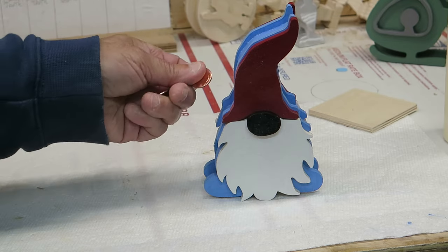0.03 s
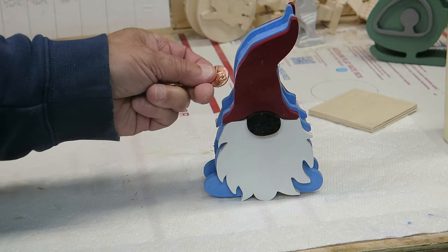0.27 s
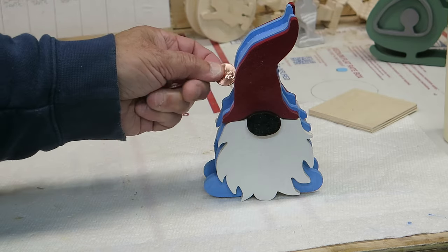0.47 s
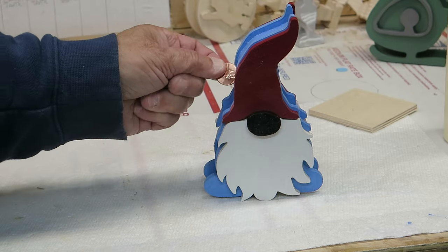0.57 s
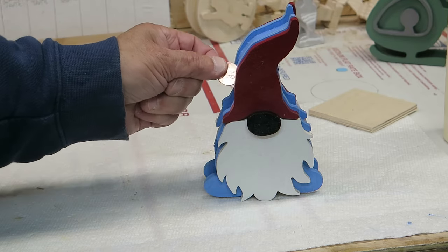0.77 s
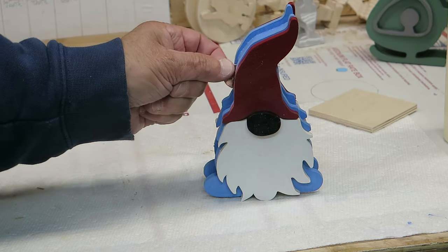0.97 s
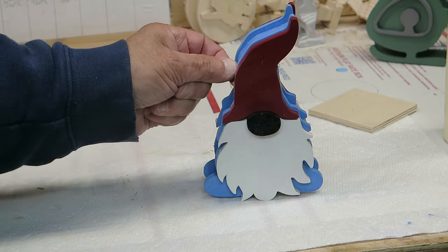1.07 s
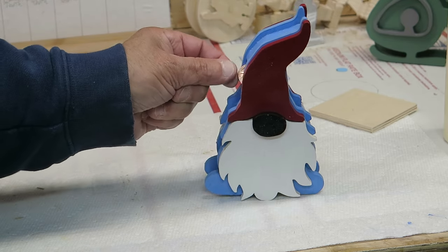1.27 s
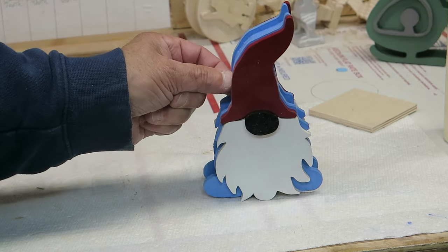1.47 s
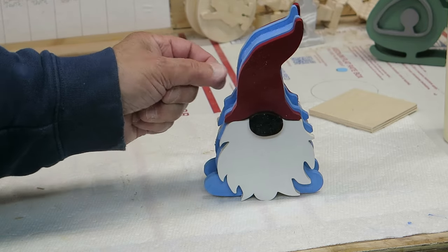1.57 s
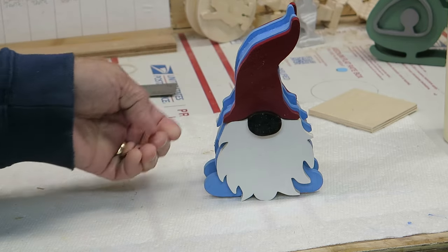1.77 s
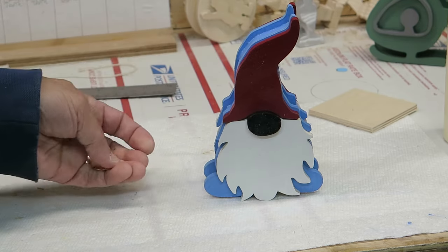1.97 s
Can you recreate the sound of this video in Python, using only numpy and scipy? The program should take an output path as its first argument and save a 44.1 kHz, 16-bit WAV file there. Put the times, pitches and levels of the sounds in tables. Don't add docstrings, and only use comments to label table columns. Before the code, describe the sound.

A coin drops into a hollow wooden bank. Only soft hiss and very faint hum are heard until about 1.59 seconds, when a loud, slightly overloaded clink with a woody knock strikes. Smaller bounces follow at 1.64, a tight rattle near 1.70, and last ticks around 1.75 to 1.8. The hiss dips, then creeps back; faint paper rustle and taps begin near 1.97. Close, quiet room.

```python
import sys
import numpy as np
from scipy import signal
from scipy.fft import rfft, irfft
from scipy.io import wavfile
from scipy.ndimage import uniform_filter1d

SR = 44100
rng = np.random.default_rng(int(sys.argv[2]) if len(sys.argv) > 2 else 0)


def boost(x):
    u = np.asarray(x, float) / 20
    return 10 ** u


def bounce(signal):
    frames = np.transpose(np.atleast_2d(signal))
    limited = np.clip(frames, -1, 1)
    pcm = np.round(limited * 32767).astype(np.int16)
    wavfile.write(sys.argv[1], SR, pcm)


N = 88596

# (frequency [Hz], density [dB per Hz])
HISS_MID = [(15, -37), (25, -12), (113, -3.5), (290, -5), (332, -6), (1310, -8), (4540, -12.5),
            (10700, -20.5), (15700, -29.5)]
HISS_SIDE = [(15, -49), (25, -32), (116, -3), (283, 0), (634, -5.5), (2130, -17.5), (3660, -20.5),
             (11700, -27), (15700, -33.5)]
HISS_MID_DB, HISS_SIDE_DB = -49, -47.5
HUM_HZ, HUM_DB, HUM_WIDTH_HZ = 120, -68.5, 13

DUCK_DB, DUCK_AT_S, DUCK_FALL_S, RECOVER_DB_PER_S = -12.5, 1.592, 0.0044, 14

CONTACT_TIMES = [1.5889, 1.5900, 1.5931, 1.5944, 1.6439, 1.6471, 1.6496, 1.6720, 1.6900, 1.6936, 1.6953,
                 1.6975, 1.6989, 1.7008, 1.7031, 1.7070, 1.7511, 1.7535, 1.7550, 1.7569, 1.7593, 1.7800]
# (peak [dB], wooden knock re peak [dB], best rung mode [Hz], its lift [dB])
CONTACTS = [(5, -4, 7220, 1), (2, 2.5, 5260, 3.5), (-8, -14, 9360, 10.5), (-12, -26.5, 7220, 4.5),
            (-19.5, -8, 7220, 6), (-16.5, -27, 9360, 14.5), (-31, -6, 5260, 8), (-27, 3, 7220, 3.0),
            (-20.5, -24, 9080, 3.0), (-24, -16, 10850, 3), (-15.5, -34, 10850, 11), (-13.5, -8, 8820, 17),
            (-17.5, -7.5, 7220, 3.5), (-11.5, -26, 5040, 6), (-21.5, -16.5, 10850, 12),
            (-24.5, -2, 12600, 25.5), (-26, -15.5, 7220, 4), (-19, -9.5, 8820, 12), (-25, -8, 5260, -3),
            (-20, -17, 7220, 6), (-31.5, -17, 12600, 30), (-34.5, 9, 5040, 22)]
# (frequency [Hz], level [dB], t60 [s])
COIN_MODES = [(4330, -8.5, 0.0196), (5070, -10, 0.045), (5290, -0.5, 0.016), (6100, -18.5, .03),
              (6980, -4.5, 0.039), (7230, -2, 0.031), (7100, -22, .03), (8760, 0.5, 0.016),
              (8770, -20, 0.052), (9570, -3.5, 0.048), (9700, -7.5, 0.023), (10780, -12, 0.045),
              (11960, -14.5, .03), (12600, -28.5, 0.11)]
# (frequency [Hz], level [dB], t60 [s])
BOX_MODES = [(2015, -29.5, 0.0072), (2556, -6.5, 0.015), (2855, -5.5, 0.012), (3500, -6, .012)]
# (frequency [Hz], level [dB])
CRACK_COLOUR = [(500, -57), (1500, -31), (2300, -10.5), (6100, -11), (7200, 3.5), (8100, -10.5),
                (10600, -6), (15700, -31)]
CRACK_DB, CRACK_T60_S = 5.5, 0.0098
RING_DB, RING_SPREAD_DB, DETUNE = -6, 1, 0.006
LIFT_WIDTH = 0.02
RISE_S = 0.0002
# (frequency [Hz], side re mid [dB])
COIN_WIDTH = [(1000, -17.5), (3000, -24), (5000, -11.5), (9000, -11.5), (14000, -8)]
# (time [s], modes of (frequency [Hz], level [dB], t60 [s]))
BASE_THUDS = [
    (1.589, [(89, -48, .05), (225, -40, 0.018), (700, -33, .02), (798, -27.5, .02), (1277, -38, 0.014), (1750, -18, 0.0088)]),
    (1.7072, [(490, -61, 0.024), (970, -41, 0.01)]),
]
# (time [s], level [dB])
ROCKING = [
    (1.595, -52),
    (1.64, -50.5),
    (1.685, -41.5),
    (1.705, -29),
    (1.745, -44.5),
    (1.765, -37),
    (1.795, -42),
    (1.83, -65),
]
# (frequency [Hz], level [dB])
ROCKING_COLOUR = [(1500, -6), (3000, 4), (8000, -1), (12000, 3.5), (15000, 11)]
ROCKS_PER_S, ROCK_SPREAD_DB = 2500, 2.0

# (frequency [Hz], t60 [s])
ROOM_DECAY = [(1000, 0.076), (3000, 0.32), (8000, .25), (14000, 0.2)]
ROOM_DB = -18

# (time [s], level [dB])
RUSTLE = [
    (1.955, -71),
    (1.98, -58),
    (2.009, -47),
]
# (frequency [Hz], level [dB])
RUSTLE_COLOUR = [(59, -32), (100, -12), (2280, -14), (2570, -9), (3470, -0.5), (4150, -15.5),
                 (12000, -24.5), (15600, -54), (22000, -120)]
# (time [s], level [dB], frequency [Hz], t60 [s])
HAND_TICKS = [
    (1.9805, -43, 1200, 0.0047),
    (1.986, -40.5, 698, 0.0099),
    (1.992, -44.5, 300, 0.011),
    (2.002, -38.5, 3500, 0.023),
    (2.006, -42.5, 510, 0.023),
]

CEILING, EDGE_HZ = 0.94, 16000


def evened(x):
    return x / np.sqrt(np.mean(x ** 2) + 1e-20)


def read(points, hz):
    f, value = np.transpose(points)
    return np.interp(np.log(hz + 1), np.log(f + 1), value)


def swell(curve):
    s, db = np.transpose(curve)
    return boost(np.interp(np.arange(N) / SR, s, db, -140, -140))


def coloured(x, points):
    size = x.shape[-1]
    gain = boost(read(points, np.fft.rfftfreq(size, 1 / SR)))
    return irfft(rfft(x) * gain, size)


def add(mix, s, sound):
    part = mix[..., round(s * SR):][..., :sound.shape[-1]]
    part += sound[..., :part.shape[-1]]


def ring(modes, extra_db, phase):
    hz, db, t60 = np.transpose(modes)[..., None]
    t = np.arange(6000) / SR
    decay = boost(db + extra_db[:, None] - 60 * t / t60)
    return (decay * np.sin(2 * np.pi * hz * t + phase[:, None])).sum(0)


def plain_ring(modes):
    zeros = np.zeros(len(modes))
    return ring(modes, zeros, zeros)


def hiss():
    mid_noise, side_noise, hum_noise, drift = rng.standard_normal((4, N))
    off_hum = (np.fft.rfftfreq(N, 1 / SR) - HUM_HZ) / HUM_WIDTH_HZ
    hum = irfft(rfft(hum_noise) / (1 + off_hum ** 2), N)
    drift = uniform_filter1d(uniform_filter1d(drift, 900), 900)
    waver = boost(0.55 * evened(drift))
    mid = boost(HISS_MID_DB) * evened(coloured(mid_noise, HISS_MID)) + boost(HUM_DB) * evened(hum)
    side = boost(HISS_SIDE_DB) * evened(coloured(side_noise, HISS_SIDE))
    return waver * np.array([mid, side])


def gain_control():
    t = np.arange(N) / SR - DUCK_AT_S
    fall_db = DUCK_DB * np.clip(t / DUCK_FALL_S, 0, 1)
    recovery_db = RECOVER_DB_PER_S * np.maximum(t, 0)
    return boost(np.minimum(fall_db + recovery_db, 0))


def contact(peak_db, wood_db, best_hz, lift_db):
    t, hz = np.arange(6000) / SR, np.transpose(COIN_MODES)[0]
    draw = rng.standard_normal((3, len(hz)))
    noise = rng.standard_normal((2, 6000))
    crack = evened(coloured(noise, CRACK_COLOUR)) * boost(CRACK_DB - 60 * t / CRACK_T60_S)
    lift = lift_db * np.exp(-(np.log(hz / best_hz) / LIFT_WIDTH) ** 2)
    ring_db = RING_DB + RING_SPREAD_DB * draw[0] + lift
    modes = np.array(COIN_MODES)
    modes[:, 0] *= 1 + DETUNE * rng.standard_normal(len(hz))
    box_draw = draw[2, :len(BOX_MODES)]
    knock = ring(BOX_MODES, wood_db + 2.0 * box_draw, 0 * box_draw)
    mid = crack[0] + ring(modes, ring_db, draw[1]) + knock
    side = coloured(crack[1] + ring(modes, ring_db, 3 * draw[2]), COIN_WIDTH)
    both = np.array([mid, side]) * np.minimum(t / RISE_S, 1)
    return boost(peak_db) * both / abs(both[0]).max()


def bounces():
    out = np.zeros((2, N))
    for s, strength in zip(CONTACT_TIMES, CONTACTS):
        add(out, s, contact(*strength))
    for s, modes in BASE_THUDS:
        add(out[0], s, plain_ring(modes))
    return out


def rocking():
    strength = boost(ROCK_SPREAD_DB * rng.exponential(1, N))
    ticks = strength * (rng.random(N) < ROCKS_PER_S / SR) * swell(ROCKING)
    kind = rng.integers(0, len(COIN_MODES), N)
    out = np.zeros((2, N))
    for k, mode in enumerate(COIN_MODES):
        tick = contact(0, -5.5, mode[0], 3.0)
        out += signal.oaconvolve((ticks * (kind == k))[None], tick, axes=1)[:, :N]
    return coloured(out, ROCKING_COLOUR) * boost(-9)


def room(x):
    taps = np.zeros((2, SR // 2))
    at = np.arange(160, SR // 2 - 20, 20)
    at = at + rng.integers(0, 20, (2, len(at)))
    np.put_along_axis(taps, at, rng.choice([-1., 1.], at.shape), 1)
    hz, t, z = signal.stft(taps, SR, nperseg=128)
    decay = boost(-60 * t / read(ROOM_DECAY, hz)[:, None])
    tail = signal.istft(z * decay, SR, nperseg=128)[1]
    wet = signal.fftconvolve(x[None], tail / np.linalg.norm(tail[0]), axes=1)[:, :N]
    return boost(ROOM_DB) * np.array([wet[0], boost(15.5) * coloured(wet[1], COIN_WIDTH)])


def hand():
    grain = rng.standard_normal(N) * boost(3.66 * rng.exponential(1, N))
    out = swell(RUSTLE) * evened(coloured(grain, RUSTLE_COLOUR))
    for s, db, hz, t60 in HAND_TICKS:
        add(out, s, plain_ring([(hz, db, t60)]))
    return np.array([out, 0.2 * out])


def scene():
    coin = bounces() + rocking()
    mid, side = coin + room(coin[0]) + hiss() * gain_control() + hand()
    return np.array([(mid + side) * boost(0.24), (mid - side) * boost(-0.22)])


def roll_off(x):
    return signal.sosfilt(signal.butter(12, 15820, fs=SR, output="sos"), x)


def record(dry):
    clipped = np.clip(dry, -CEILING, CEILING)
    band_limit = signal.firwin(63, EDGE_HZ, fs=SR)
    finished = signal.oaconvolve(clipped, band_limit[None], "same", axes=1)
    return roll_off(finished)


dry = scene()
out = record(dry)
bounce(out)
```